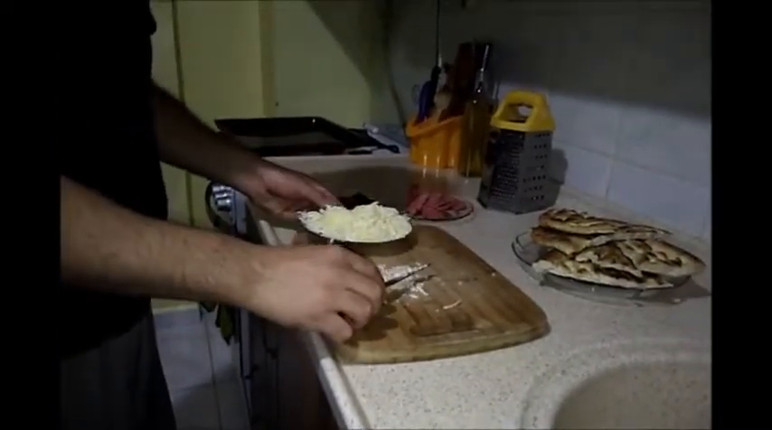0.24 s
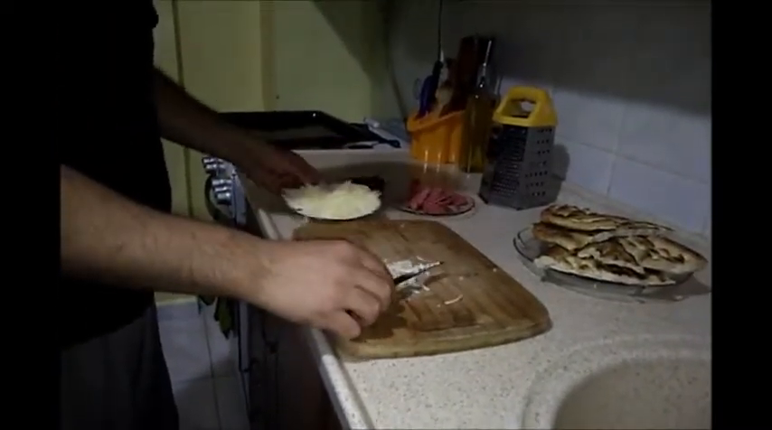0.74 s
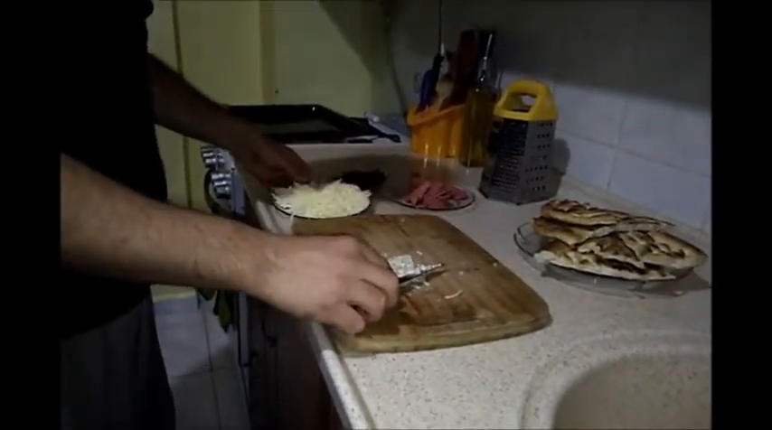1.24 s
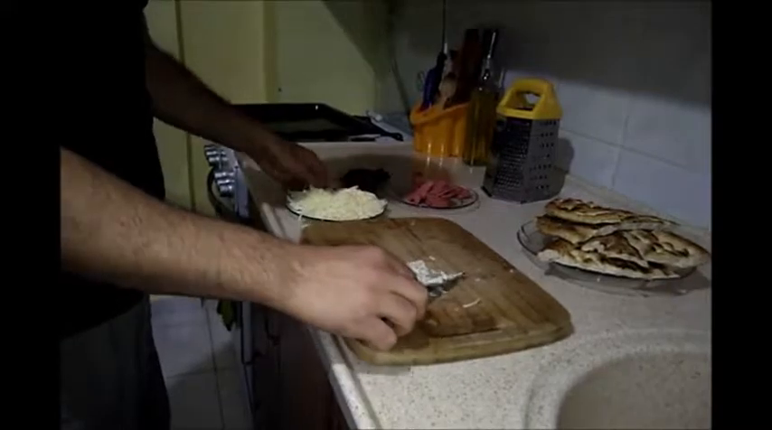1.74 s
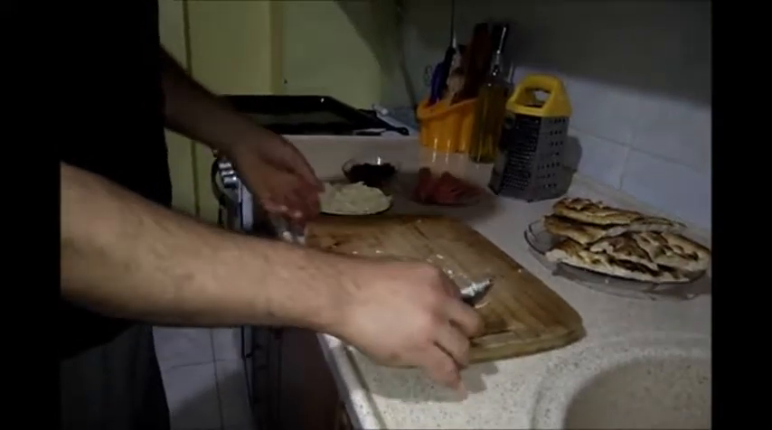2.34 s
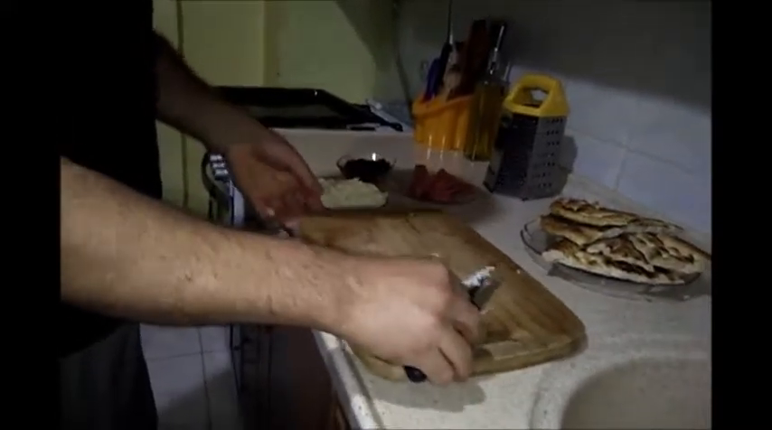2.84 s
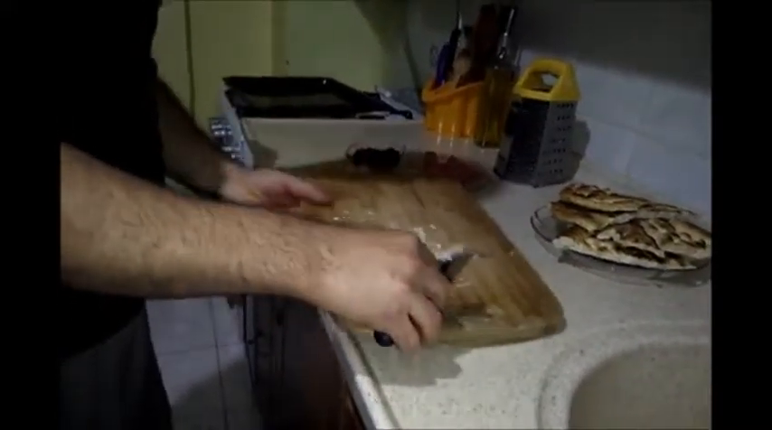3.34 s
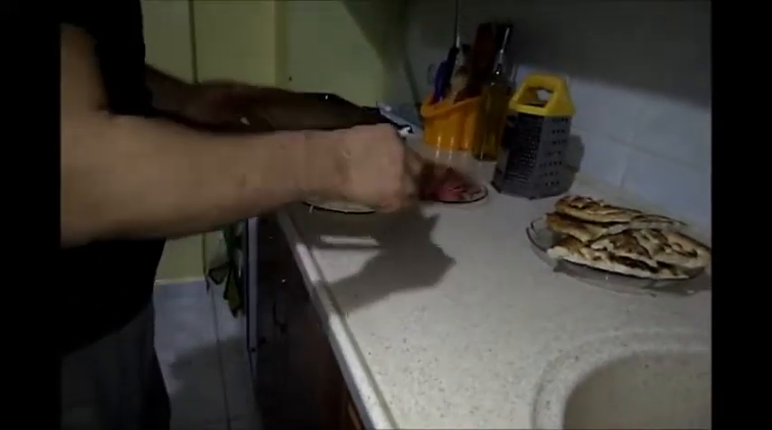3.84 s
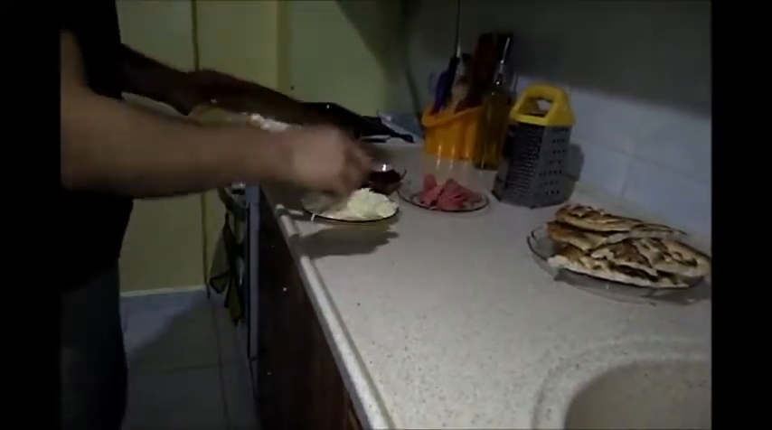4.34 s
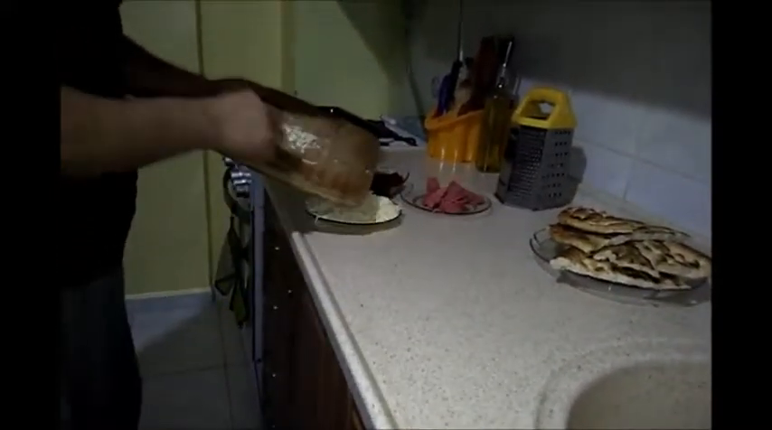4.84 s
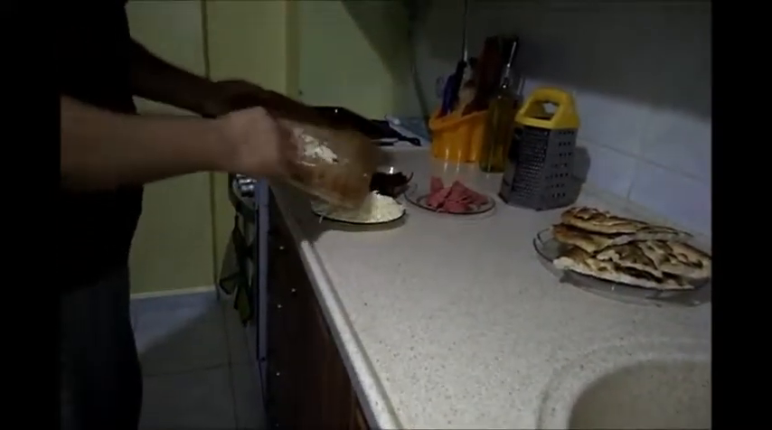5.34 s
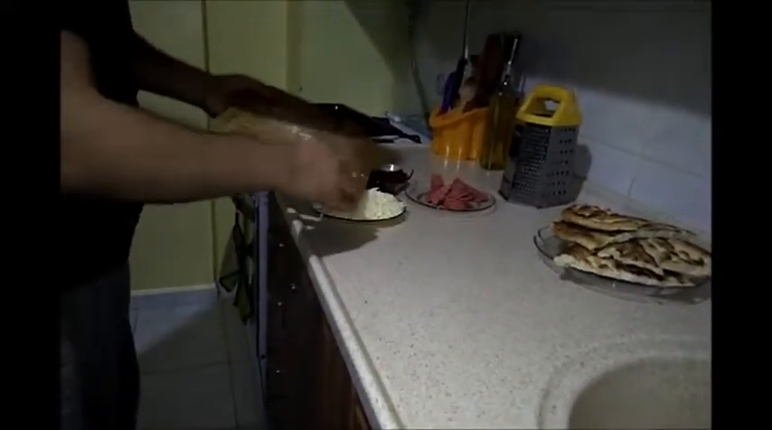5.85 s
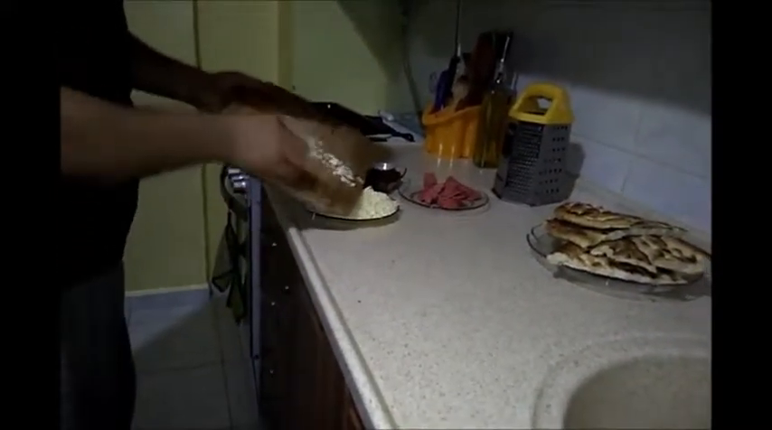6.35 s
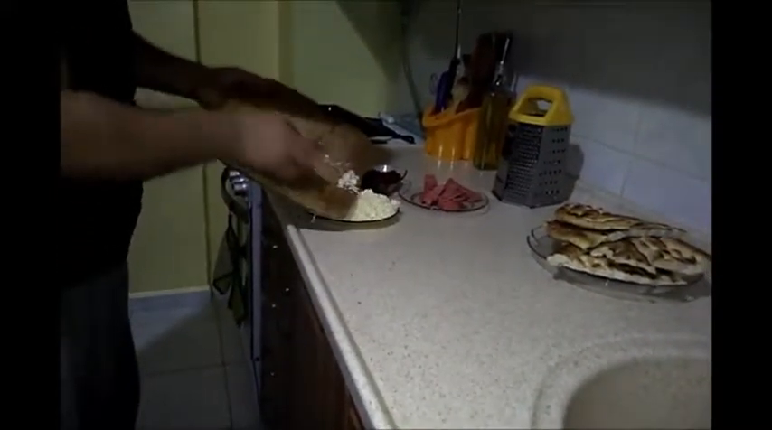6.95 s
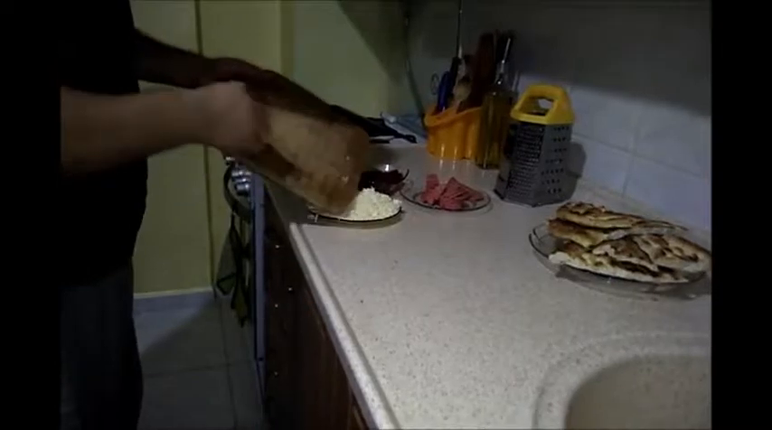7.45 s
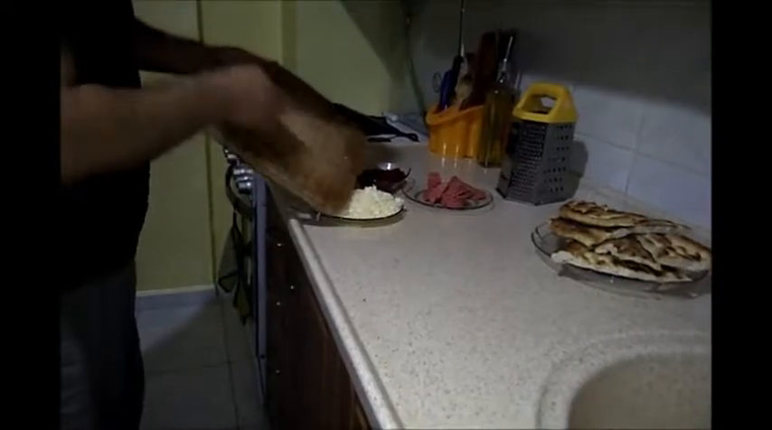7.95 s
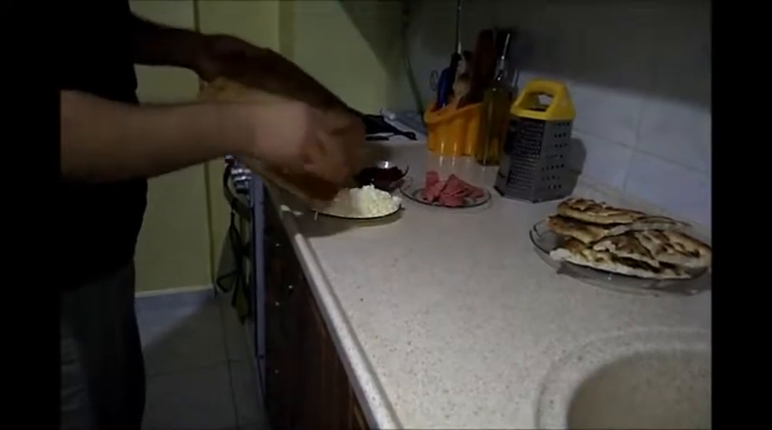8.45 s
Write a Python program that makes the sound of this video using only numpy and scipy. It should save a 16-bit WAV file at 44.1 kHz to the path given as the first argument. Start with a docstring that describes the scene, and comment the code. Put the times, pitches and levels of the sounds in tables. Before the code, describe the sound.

Close to a kitchen counter: brief grinding and three or four wooden bumps, clinks of crockery, and a plate set down hard and bright. Handling thumps and a dull knock follow as a cutting board is moved. Then six separate knife scrapes over wood, some hollow and booming, later ones brighter and hissier, with small ticks between them. A sharp wooden rap closes it. Short hard-walled echo, quiet air noise, faint hum and whine.

```python
"""A knife scrapes the last shreds of grated cheese off a wooden board onto a plate in six strokes, then raps
the wood: clumped stick-slip snaps drive the board, the blade and the shreds, and the hand's pressure sets levels.
Before that, plate and board slide as coloured noise; clinks, bumps and the plate set down are ringing blows.
A small tiled kitchen echoes the scraping and knocks; air noise, a faint hum and a thin whine lie underneath."""
import sys
import numpy as np
from scipy import signal
from scipy.fft import rfft, irfft
from scipy.io import wavfile
from scipy.ndimage import uniform_filter1d

SR = 44100
rng = np.random.default_rng(int(sys.argv[2]) if len(sys.argv) > 2 else 0)


def to_wav(s):
    """Save 16-bit WAV."""
    ch = np.atleast_2d(s).T  # columns
    pcm = np.round(np.clip(ch, -1, 1) * 32767)  # PCM
    wavfile.write(sys.argv[1], SR, pcm.astype(np.int16))


N = 383792
TIME = np.arange(N) / SR
FILTER_TAPS = 8192
FILTER_HZ = np.fft.rfftfreq(FILTER_TAPS, 1 / SR)
TOP_EDGE_HZ = 16100
AIR_DB = -65.5
LAND_S, PRESS_SHAPE = 0.0062, 1.49  # time for the blade to bite; roundness of the arch of pressure

# Frequency bands of a knock: low_hz, high_hz
KNOCK_BANDS = [(50, 250), (250, 900), (900, 2500), (2500, 6000), (6000, 11000)]
# Blows, one table per struck thing: start_s, level_db in each of the five bands before gain_db,
# left_over_right_db
WOOD_BUMPS = [(0.516, -58.5, -43, -39, -60.5, -64, 0), (0.611, -68, -48, -46.5, -54, -63.5, -0.45),
              (0.725, -70, -49.5, -49, -62, -71, 0), (3.036, -60, -61, -62.5, -68, -78, -2),
              (3.108, -62, -62, -63, -73, -76, -2), (3.214, -61, -58, -66.5, -72, -74, -2),
              (3.341, -56.5, -42.5, -43.5, -67, -72, -0.74)]
SAUCER_CLINKS = [(0.837, -50, -45, -39.5, -30, -30, -2.5)]
BOWL_CLINKS = [(1.071, -51.5, -44, -36, -33, -33, -2), (1.418, -68, -56.5, -62, -51.5, -47.5, -1)]
PLATE_LANDINGS = [(1.834, -58, -50.5, -39, -44.5, -55.5, -1.8), (1.839, -42, -31.5, -23, -20.5, -27, -1.5),
                  (1.863, -42.5, -36.5, -34, -37.5, -35, -1.3)]
KNIFE_TAPS = [(4.819, -61, -61, -51, -50, -73, -2), (6.276, -74, -56.5, -59, -49.5, -41, -2),
              (6.751, -79, -72, -65, -66.5, -76, -9), (6.915, -76, -54, -66, -67, -74, -2),
              (7.57, -77, -52, -60.5, -57, -49, -2), (8.108, -69, -52.5, -50, -53.5, -52.5, -1.5),
              (8.607, -44, -34, -22.5, -16.5, -19, -2)]
# Small dry ticks: start_s, onset_level_db, decay_s
TICKS = [(1.329, -45.5, 0.012), (2.355, -49.5, 0.0099), (4.631, -45.5, .0042), (5.422, -47.5, .023),
         (5.454, -50.5, .0098), (5.478, -47.5, .0057), (5.82, -43, 0.0053), (6.179, -48, 0.0028),
         (6.216, -56, .001), (6.235, -43.5, 0.0014), (6.771, -55, 0.0015)]
# Soft low thumps of handling: start_s, onset_level_db, pitch_hz, decay_s
THUMPS = [(1.84, -41.5, 86, 0.087), (3.039, -51.5, 70, 0.067), (3.17, -57, 63.6, 0.057),
          (3.214, -56, 57.3, .073), (3.74, -51, 99, 0.063), (5.383, -60, 59.5, 0.069),
          (5.439, -53, 71.6, 0.047), (5.468, -54, 81, .032), (5.813, -48.5, 79.5, .015),
          (5.933, -53, 68, 0.029), (6.034, -61.5, 78, .053)]
# Knife strokes: start_s, swell_s, ease_s, landing_drop_db, liftoff_drop_db,
# boom_db, rasp_db, song_db, hiss_db (levels at the press peak), blade_pitch_factor
STROKES = [(4.821, 0.24, 0.13, 10.5, 2.5, -47, -52.5, -55, -48.5, 1),
           (5.539, 0.089, 0.21, 20.5, 10, -57.5, -51, -57.5, -57.5, 0.95),
           (6.278, .125, .185, 6.5, 9, -42, -64.5, -55, -53.5, 1.04),
           (6.915, 0.16, .115, 9, 8, -46.5, -53, -51.5, -48.5, 1.03),
           (7.571, .18, 0.043, 14, 3, -53, -46.5, -48.5, -43, .98),
           (8.109, .17, 0.073, 20, 7.5, -50.5, -47, -49.5, -39.5, 1.02)]
# Plate or board pushed along: start_s, rise_s, fade_s, rumble_peak_db, grind_peak_db
DRAGS = [(.3, 0.2, 0.24, -62, -46), (.5, 0.054, .4, -56.5, -61), (1.13, 0.026, 0.14, -53.5, -46.5),
         (1.42, 0.2, 0.71, -65, -62.5), (2.12, 0.16, .12, -61.5, -76), (2.53, 0.21, 0.29, -63.5, -79),
         (2.76, .3, .28, -69, -60.5), (3.12, 0.083, 0.16, -48, -70), (3.3, 0.17, 0.33, -62.5, -63),
         (4.45, 0.091, 0.19, -76, -66)]
# Light brushes over the wood: start_s, rise_s, fade_s, peak_db
BRUSHES = [(0.0, 0.0067, 0.36, -61.5), (1.32, 0.027, 0.052, -49.5), (2.25, 0.38, 0.43, -63.5),
           (2.92, 0.34, .4, -58.5), (3.37, 0.077, 0.21, -47.5), (3.55, 0.29, 0.52, -64.5),
           (4.39, 0.13, 0.062, -57.5), (5.24, 0.1, .2, -62)]
# Resonances of each struck or rubbed thing: pitch_hz, width_hz, level_db against the broad sound
BOARD_MODES = [(578, 36, 13), (780, 33, 8.5), (1035, 30, 5), (1256.4, 37, 11.5), (1768, 110, 13),
               (2140, 77, 2), (2450, 61, 4), (2760, 150, 4), (3030, 99, 3), (3370, 126, 9.5),
               (4770, 460, 4.5)]
PLATE_MODES = [(80.6, 19, 4.8), (1370, 38, 4.8), (2198, 95, 14), (3524, 200, 11.1), (5185, 110, 14),
               (7600, 130, 22.8), (10130, 150, 17), (11690, 160, 18.4), (15420, 120, 20)]
COUNTER_MODES = [(161, 30, 10), (358.7, 21, 7), (474, 44.2, 7), (586, 24, 10.2), (918, 50, 7.6),
                 (1344, 72, 7.1), (1847, 80, 3.4), (2210, 150, 1)]
SAUCER_MODES = [(452, 61, 9), (3320, 70, 12), (4100, 160, -7), (5130, 130, 10.5), (5470, 110, 11.5),
                (6970, 120, 9), (7461, 80, 2), (8540, 120, 14.5), (12600, 240, 11)]
BOWL_MODES = [(167, 36, 5), (1270, 380, 6.5), (1543, 91, -2), (2170, 36, 8), (5140, 120, 13),
              (5990, 46, 14), (6400, 44, 16.5), (7400, 89, 9.5), (8070, 76, 16)]
# Low modes of the held board: pitch_hz, width_hz, level_db against the broad sound
BOOM_MODES = [(541, 9.6, 13.5), (560, 12.5, 25.5), (584, 12.5, 26), (648, 34, 9), (797, 45, 5)]
# Knife modes, before they drift: pitch_hz, width_hz, relative_level_db
BLADE_MODES = [(1790, 140, -0.5), (2040, 200, 0), (2340, 270, -1.5), (2666, 200, -5), (3080, 390, -11),
               (3446, 140, -9)]
# Broad spectra of each texture: frequency_hz, relative_density_db per Hz
BOOM_SPECTRUM = [(150, -25.5), (400, -11.5), (520, -1.5), (660, 5.5), (880, -15), (2000, -63), (8000, -86)]
RASP_SPECTRUM = [(100, -20), (250, -9), (380, 1.5), (800, 0.5), (1000, 1), (1500, 4), (2000, -6.5),
                 (2600, -1), (4000, -31), (7000, -57), (14000, -69)]
HISS_SPECTRUM = [(1200, -13.5), (2300, -2.5), (3200, 2), (3800, -1), (4600, 0), (6000, 0.5), (8200, 2),
                 (9800, -4), (12500, -20.5), (14000, -44)]
GRIND_SPECTRUM = [(60, -33), (150, -14), (230, -8.5), (400, -4), (750, -6.5), (1100, -4.5), (1500, -9),
                  (1800, -16.5), (2400, -18), (3500, -24), (5000, -32), (9000, -56.5)]
RUMBLE_SPECTRUM = [(25, -30), (50, -15), (70, 13), (100, -1), (140, -9), (200, -11), (300, -26.5),
                   (1000, -59.5), (4000, -89.5)]
BRUSH_SPECTRUM = [(1000, -16), (3000, -5.5), (4600, -3), (6000, -2), (8000, 2), (10000, -12), (12500, -21),
                  (14000, -37)]
TICK_SPECTRUM = [(300, 1), (1500, 3.5), (4000, -1.5), (6000, 10.5), (9000, 7), (12000, -14.5), (15000, -39)]
THUD_SPECTRUM = [(20, -21), (42, -5), (60, 10), (130, -1.5), (250, -6), (500, -11), (1200, -30),
                 (4000, -51.5), (12000, -77.5)]
AIR_SPECTRUM = [(25, -18.5), (60, -5.5), (90, -7), (150, -12), (280, -9.5), (600, -16.5), (1200, -18),
                (2500, -16), (5000, -18), (7500, -15), (9300, -14.5), (10300, -25), (12000, -44),
                (14000, -45)]
# Steady hum and whine: pitch_hz, rms_level_db
TONES = [(80.7, -85), (100, -78.5), (5491, -81), (9335, -88.5), (9383, -69.5), (9432, -93.5)]
# Decay of the kitchen's tail: frequency_hz, t60_s
KITCHEN_DECAY = [(100, .55), (260, 0.44), (700, 0.34), (1840, 0.34), (4850, 0.37), (10000, 0.29)]
# Likeness of left and right in diffuse sound: frequency_hz, correlation (0 to 1)
LIKENESS = [(60, 0.76), (300, 0.68), (600, .7), (1200, 0.15), (2500, 0), (12000, 0)]


def amp(db):
    """Decibels to gain."""
    return 10 ** (np.asarray(db) / 20)


def unit(x):
    """Scales to rms 1."""
    return x / np.sqrt(np.mean(x ** 2) + 1e-20)


def read(points, hz):
    """Reads a table on a log-frequency axis."""
    f, value = np.transpose(points)
    return np.interp(np.log(hz + 1), np.log(f + 1), value)


def add(mix, s, sound):
    """Mixes a stereo sound in at time s."""
    part = mix[:, max(round(s * SR), 0):][:, :sound.shape[-1]]
    part += sound[..., :part.shape[1]]


def pan(db):
    """Gains of the two channels; positive db leans left."""
    return amp([[db / 2], [-db / 2]])


def wander(per_s):
    """A random curve of spread about 1, with per_s turning points a second."""
    return np.interp(TIME * per_s, np.arange(N), rng.standard_normal(N))


def steadied(x, span_s):
    """Evens out slow swells, so that the gain curve applied afterwards sets the level."""
    power = uniform_filter1d((x ** 2).mean(0), round(span_s * SR))
    return x / np.sqrt(power + 1e-20)


def colour(x, spectrum, modes=()):
    """Causal filter: a broad spectrum with resonances standing out of it."""
    peaks = 1
    for hz, width, db in modes:
        peaks = peaks + amp(db) ** 2 / (1 + (2 * (FILTER_HZ - hz) / width) ** 2) ** 1.5
    # folding the cepstrum gives minimum phase: the ring starts at once
    cepstrum = irfft(np.log(amp(read(spectrum, FILTER_HZ)) * np.sqrt(peaks)))
    cepstrum[1:FILTER_TAPS // 2] *= 2
    cepstrum[FILTER_TAPS // 2 + 1:] = 0
    ring = irfft(np.exp(rfft(cepstrum)))[:FILTER_TAPS // 2]
    return signal.oaconvolve(np.atleast_2d(x), ring[None], axes=1)[:, :x.shape[-1]]


def diffuse(size):
    """White noise from all around: most alike at both ears in the bass."""
    a, b = rfft(rng.standard_normal((2, size)))
    same = np.clip(read(LIKENESS, np.fft.rfftfreq(size, 1 / SR)), -1, 1)
    return irfft([a, same * a + np.sqrt(1 - same ** 2) * b], size)


def room(x, direct_db):
    """Direct sound, a cluster of echoes off counter and tiles, and a tail that dies by band."""
    hz, t, grains = signal.stft(diffuse(size=SR // 2), SR, nperseg=256)
    tail = amp(-60 * t / read(KITCHEN_DECAY, hz)[:, None])
    early = 1 + np.exp(-t / 0.0077)  # the first milliseconds are denser
    echo = signal.istft(grains * tail * early, SR, nperseg=256)[1]
    echo /= np.linalg.norm(echo[0])
    echo[:, 0] += amp(direct_db)
    echo /= np.linalg.norm(echo[0])
    return signal.oaconvolve(np.atleast_2d(x), echo, axes=1)[:, :x.shape[-1]]


def slips(per_s, spread_db, clump_db, clump_hz):
    """Stick and slip: tiny snaps of uneven size that come in clumps."""
    size = amp(spread_db * np.minimum(rng.exponential(1, N), 4))
    snaps = size * rng.choice([-1, 1], N) * (rng.random(N) < per_s / SR)
    return unit(snaps * amp(clump_db * wander(clump_hz)))


def background():
    """Still kitchen air as coloured noise, with a low hum and a thin electrical whine as steady sines."""
    tones = np.zeros(N)
    for hz, db in TONES:
        tones += amp(db) * np.sqrt(2) * np.sin(2 * np.pi * (hz * TIME + rng.random()))
    air = unit(colour(diffuse(size=N), AIR_SPECTRUM))
    return amp(AIR_DB) * air * pan(0.19) + tones


def pushes(rows, column, depth_db, shape):
    """Gain of sliding movements: each gathers speed from depth_db below its peak, then slows again."""
    gain = np.zeros(N)
    for row in rows:
        start, rise_s, fade_s = row[:3]
        first = max(round(start * SR), 0)
        t = TIME[first:first + 2 * SR] - start - rise_s  # zero at the peak
        away = np.maximum(-t / rise_s, t / fade_s)
        gain[first:first + len(t)] += amp(row[column] - depth_db * away ** shape)
    return gain


def dragging():
    """Plate and board grind over wood and counter, the cupboard below rumbles, and hands brush the wood."""
    fibres = slips(per_s=17000, spread_db=3.5, clump_db=2.0, clump_hz=68.3)
    brush = unit(colour(fibres, BRUSH_SPECTRUM))
    brush = brush * pushes(BRUSHES, column=3, depth_db=20.5, shape=1.65)

    rumble = steadied(colour(diffuse(size=N), RUMBLE_SPECTRUM), span_s=0.11)
    rumble = rumble * pushes(DRAGS, column=3, depth_db=19, shape=1.2)

    grit = slips(per_s=5100, spread_db=2, clump_db=2.5, clump_hz=64)
    grind = room(colour(grit, GRIND_SPECTRUM, COUNTER_MODES), direct_db=-7.0)
    grind = steadied(grind, span_s=0.03) * pushes(DRAGS, column=4, depth_db=22.5, shape=1.3)
    return (rumble + grind) * pan(-1.5) + room(brush, direct_db=-6.5) * pan(-4.5)


def blow(size, rise_s, chatter_s, chatter_db):
    """A snap, and a chatter of the contact that swells and dies within milliseconds."""
    t = np.arange(size) / SR
    chatter = rng.standard_normal(size) * (1 - np.exp(-t / rise_s)) * np.exp(-t / chatter_s)
    snap = signal.unit_impulse(size, round(rise_s * SR))
    return snap + amp(chatter_db) * chatter / np.linalg.norm(chatter)


def knocks(rows, modes, gain_db, rise_s, chatter_s, chatter_db, direct_db, top_db):
    """Each blow rings through the struck thing and the room, with the colour of its contact."""
    out = np.zeros((2, N))
    low, high = np.transpose(KNOCK_BANDS)
    for s, *band_db, side_db in rows:
        density = np.array(band_db) - 10 * np.log10(high - low)  # dB per Hz
        bass = [(25, density[0] - 18), (65, density[0])]
        treble = [(13000, density[-1] + top_db), (16000, density[-1] + 2 * top_db)]
        spectrum = sorted([*bass, *zip(np.sqrt(low * high), density), *treble])
        contact = room(blow(SR // 2, rise_s, chatter_s, chatter_db), direct_db)
        sound = colour(contact, spectrum, modes)
        # the summed band levels set the loudness of the first 25 ms
        loudness = np.linalg.norm(amp(band_db)) / np.std(sound[:, :SR // 40])
        add(out, s, amp(gain_db) * loudness * pan(side_db) * sound)
    return out


def wood_bumps():
    """Dull bumps of wood, ringing with the counter's low modes."""
    return knocks(WOOD_BUMPS, COUNTER_MODES, gain_db=1, rise_s=0.0012, chatter_s=0.003,
                  chatter_db=-3, direct_db=-12, top_db=-22)


def saucer_clink():
    """A bright clink against a saucer, ringing with its high modes."""
    return knocks(SAUCER_CLINKS, SAUCER_MODES, gain_db=0.9, rise_s=0.0008, chatter_s=0.0039,
                  chatter_db=-4.5, direct_db=-16, top_db=-19.5)


def bowl_clinks():
    """Clinks against a bowl: a longer contact chatter excites narrow high modes."""
    return knocks(BOWL_CLINKS, BOWL_MODES, gain_db=2.0, rise_s=0.0015, chatter_s=0.011,
                  chatter_db=0.0, direct_db=-35, top_db=-20.0)


def plate_landing():
    """The plate meets the counter in three quick contacts and rings with its own modes."""
    return knocks(PLATE_LANDINGS, PLATE_MODES, gain_db=1.0, rise_s=0.0015, chatter_s=0.00566,
                  chatter_db=2.0, direct_db=-15, top_db=-17.0)


def handling():
    """Small dry ticks of decaying noise, and thumps that swing a few slow cycles."""
    ticks, thumps = np.zeros((2, N)), np.zeros((2, N))
    t = np.arange(SR // 3) / SR
    for s, db, decay_s in TICKS:
        grain = unit(colour(diffuse(size=len(t)), TICK_SPECTRUM))
        add(ticks, s, amp(db) * grain * np.exp(-t / decay_s))
    for s, db, hz, decay_s in THUMPS:
        swing = np.sin(2 * np.pi * hz * t) * np.exp(-t / decay_s)
        push = steadied(colour(diffuse(size=len(t)), THUD_SPECTRUM), span_s=0.03) * np.exp(-t / 0.023)
        add(thumps, s, amp(db) * (swing + push))
    return room(ticks, direct_db=6) * pan(-5.0) + thumps * pan(-2.5)


def knife_taps():
    """The knife taps and finally raps the board, which rings with its wooden modes."""
    return knocks(KNIFE_TAPS, BOARD_MODES, gain_db=-3.5, rise_s=0.001212, chatter_s=0.0044,
                  chatter_db=-3, direct_db=-15, top_db=-25.0)


def pressure(column, lift_db_per_s, lean_db_per_s):
    """Gain of one layer: the blade lands, presses harder, eases and lifts off, with a tilt along the stroke."""
    gain = np.zeros(N)
    for row in STROKES:
        start, swell_s, ease_s, landing_db, liftoff_db = row[:5]
        t = TIME - start - swell_s  # zero at the press peak
        before, after = np.clip(-t / swell_s, 0, 1), np.clip(t / ease_s, 0, 1)
        arch = -landing_db * before ** PRESS_SHAPE - liftoff_db * after ** PRESS_SHAPE
        lean = lean_db_per_s * np.clip(t, -swell_s, ease_s)
        lift = lift_db_per_s * np.maximum(t - ease_s, 0)
        bite = np.clip((TIME - start) / LAND_S, 0, 1)
        gain += bite * amp(row[column] + arch + lean - lift)
    return gain


def resonate(x, hz, width):
    """A resonance that follows the curve hz: shift down to zero, smooth, shift back up."""
    turn = np.exp(2j * np.pi * np.cumsum(hz) / SR)
    r = np.exp(-np.pi * width / SR)
    return (turn * signal.lfilter([1 - r], [1, -r], x / turn)).real


def blade_song(chatter):
    """The steel sings: as the contact travels along the edge, each mode swells, fades and shifts."""
    grip, song = np.ones(N), np.zeros(N)
    for start, *_, factor in STROKES:  # each stroke holds the knife a little differently
        grip[TIME >= start] = factor
    for hz, width, db in BLADE_MODES:
        pitch = hz * grip * (1 + 0.017 * wander(per_s=13))
        swell = amp(db + 3.5 * wander(per_s=14))
        ring = resonate(resonate(chatter, pitch, width), pitch, 3 * width)
        song += swell * unit(ring)
    return steadied(song[None], span_s=0.072)


def scraping():
    """The blade chatters over the grain: the board booms and rasps, the steel sings, the shreds hiss."""
    chatter = slips(per_s=2500, spread_db=4, clump_db=3.0, clump_hz=80.1)
    boom = steadied(colour(diffuse(size=N), BOOM_SPECTRUM, BOOM_MODES), span_s=0.028)
    boom = boom * pressure(column=5, lift_db_per_s=126, lean_db_per_s=12.5)

    rasp = unit(colour(chatter, RASP_SPECTRUM, BOARD_MODES))
    rasp = rasp * pressure(column=6, lift_db_per_s=223, lean_db_per_s=-27)

    song = blade_song(chatter) * pressure(column=7, lift_db_per_s=211.5, lean_db_per_s=-3.5)

    shreds = slips(per_s=9000, spread_db=2.2, clump_db=1.6, clump_hz=140.5)
    hiss = unit(colour(shreds, HISS_SPECTRUM))
    hiss = hiss * pressure(column=8, lift_db_per_s=277, lean_db_per_s=-8)
    return boom * pan(-1.5) + room(rasp + song + hiss, direct_db=-7.5) * pan(-1.8)


def scene():
    """Everything that happens on the counter, over the still kitchen."""
    dishes = saucer_clink() + bowl_clinks() + plate_landing()
    moves = dragging() + wood_bumps() + handling()
    knife = knife_taps() + scraping()
    return background() + moves + dishes + knife


def record(dry):
    """Band limit: a steep low-pass takes away what lies above the top edge."""
    lowpass = signal.firwin(511, TOP_EDGE_HZ, window=("kaiser", 9), fs=SR)
    return signal.oaconvolve(dry, lowpass[None], "same")


dry = scene()
out = record(dry)
to_wav(out)
```